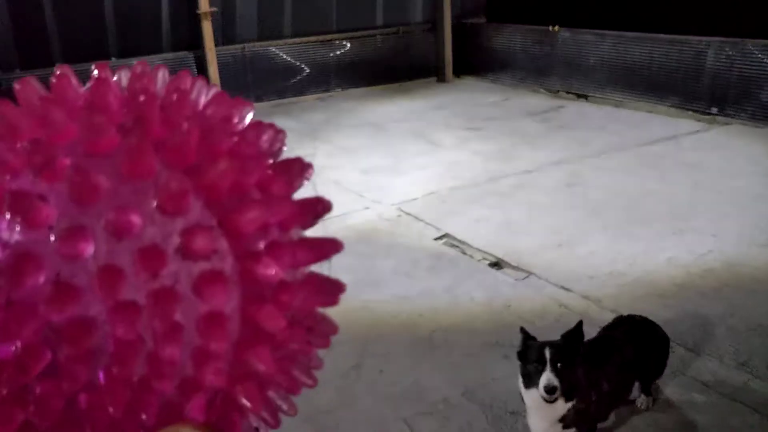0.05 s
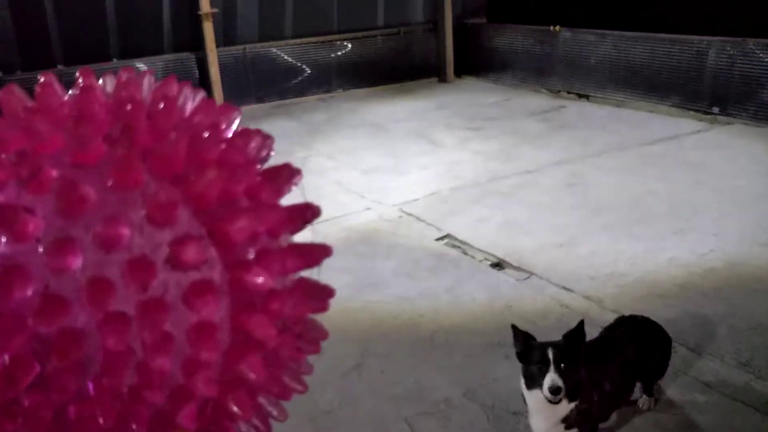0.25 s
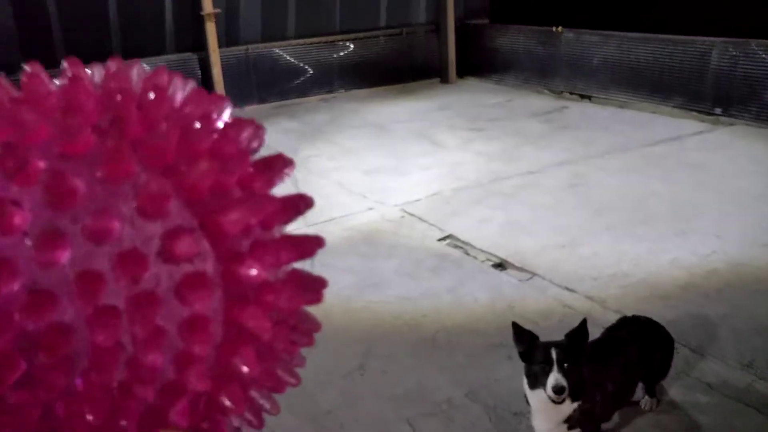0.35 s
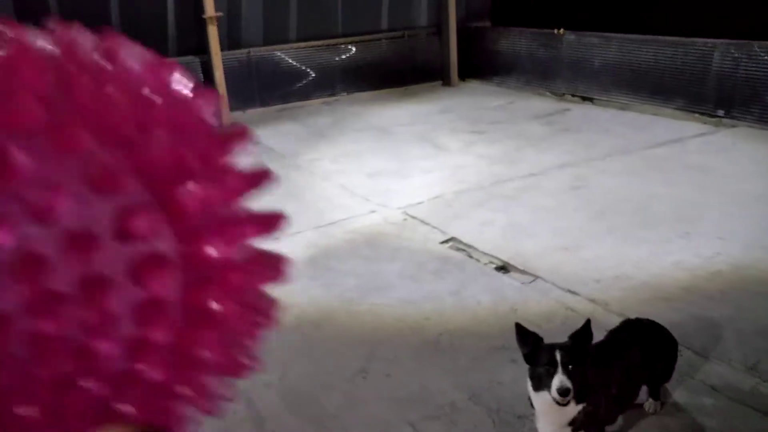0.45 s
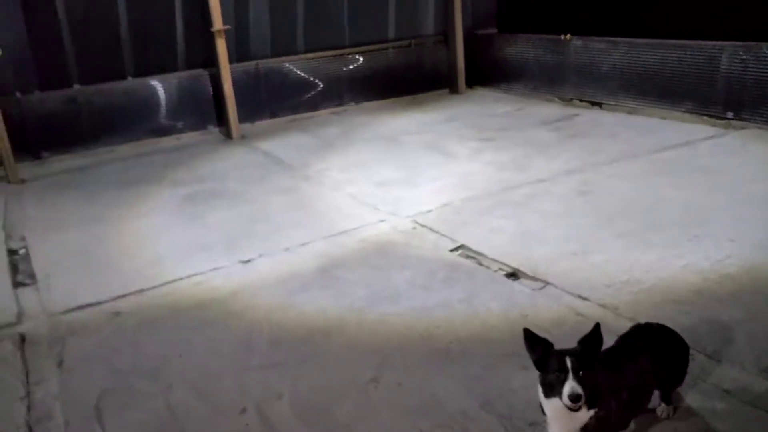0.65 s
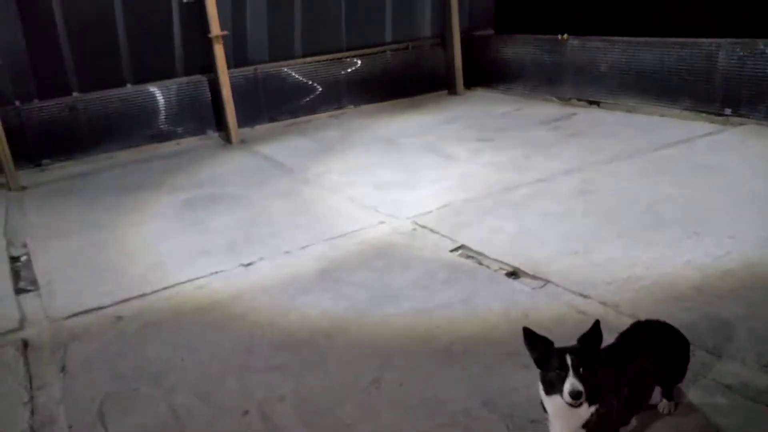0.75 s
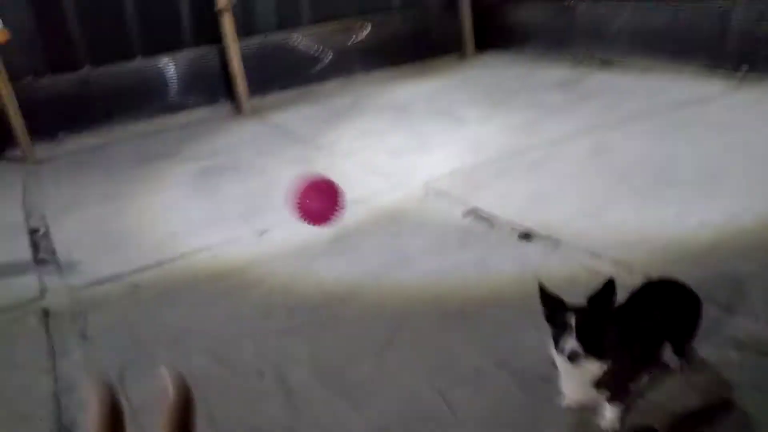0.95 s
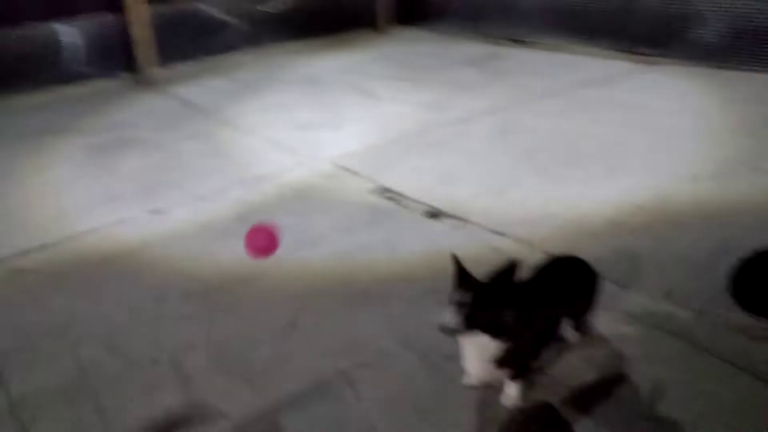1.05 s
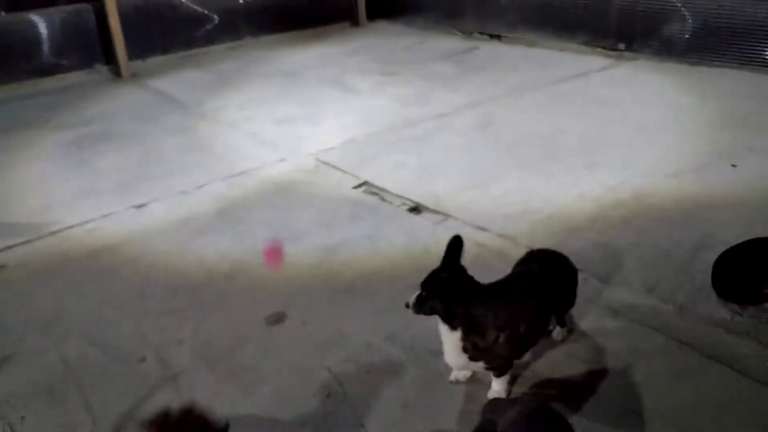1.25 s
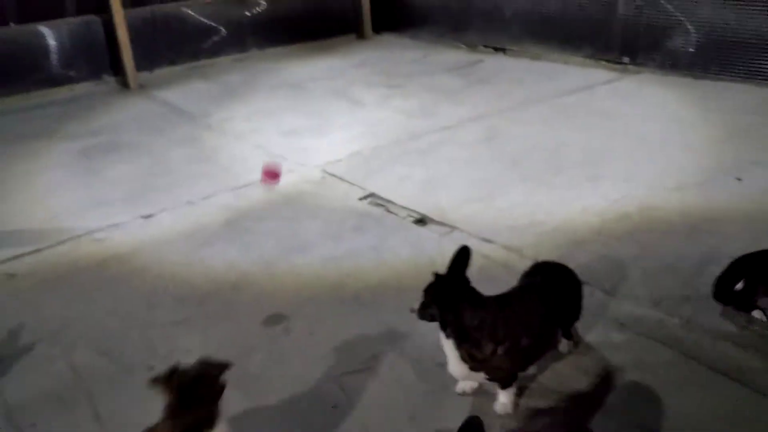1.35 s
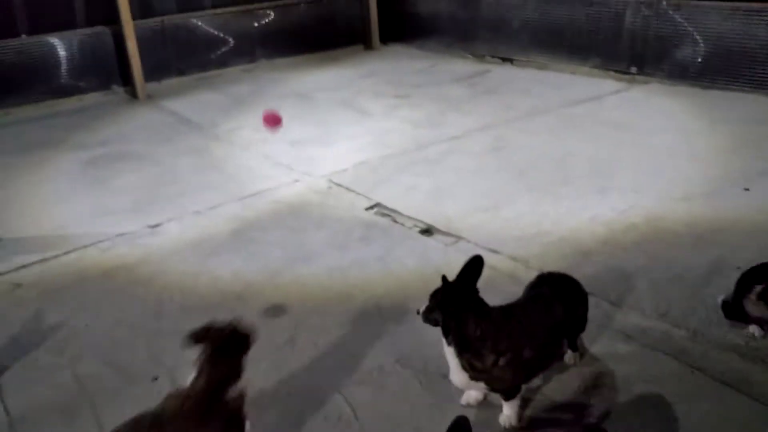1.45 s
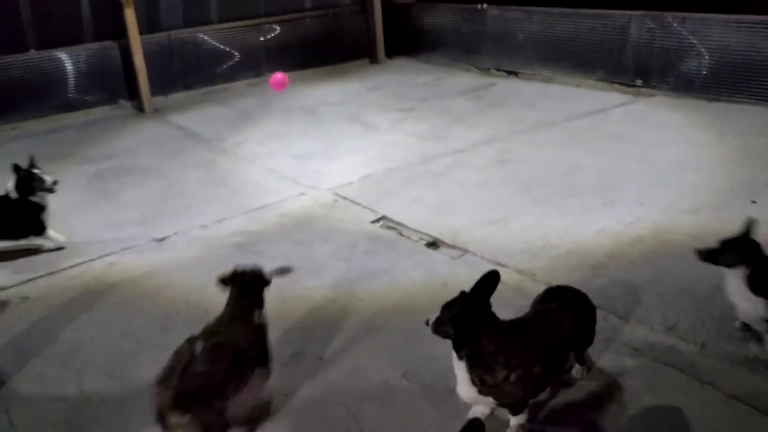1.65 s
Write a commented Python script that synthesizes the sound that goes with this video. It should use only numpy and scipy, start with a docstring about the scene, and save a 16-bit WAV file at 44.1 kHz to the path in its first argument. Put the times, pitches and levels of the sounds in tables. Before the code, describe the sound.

A hollow rubber ball bounces once on concrete at about 1.3 seconds, a slap and ringing thump echoing briefly in a shed. Soft low microphone bumps run throughout, strongest near 0.3 seconds. Clothing swishes quietly from 0.2 seconds, with a faint wavering hum from 0.5 to 1.2. Dog claws tick and paws scuff lightly from 0.9 seconds until about 1.7, over quiet room air.

```python
"""In a shed, a spiky rubber ball is thrown across the concrete floor and bounces once:
the spikes slap, the hollow shell thumps and rings, and the walls answer.
Dogs start after it, claws ticking and paws scuffing on the grit. Clothing swishes with the throw.
Underneath sit soft low bumps on the hand-held microphone, a faint wavering hum and room air."""
import sys
import numpy as np
from scipy import signal
from scipy.fft import rfft, irfft
from scipy.io import wavfile

SR = 44100
rng = np.random.default_rng(int(sys.argv[2]) if len(sys.argv) > 2 else 0)


def put_to_file(sound):
    """Save the sound as 16-bit audio at rate SR, in the file named by the first command-line argument."""
    columns = np.atleast_2d(sound).T  # one column per channel
    safe = np.clip(columns, -1, 1)
    whole_steps = np.round(safe * 32767)
    wavfile.write(sys.argv[1], SR, whole_steps.astype(np.int16))


N = 74970
T = np.arange(N) / SR

# ring of the hollow ball: f/Hz, relative level/dB, t60/s
BALL_MODES = [(157, 0.5, 0.28), (308, -1.5, 0.15), (472.6, -7.5, 0.28), (598, 3.5, 0.079), (724, -17, 0.11),
              (807, -5, 0.061), (835, -17.5, 0.25), (898, -13.5, 0.2), (1080, -13, 0.12),
              (1238, -14.5, 0.08), (1990, -11.5, 0.1), (2122, -25, 0.069), (2338, -22, 0.097),
              (2537, -24, 0.12), (2710, -21, 0.063), (3560, -27, 0.32)]
# slap of the spikes: f/Hz, relative level/dB
SLAP_EQ = [(60, 6.5), (200, -7.5), (370, -6.5), (430, 2), (650, 0), (1000, -3), (1400, -13.5), (1650, -17),
           (2100, -9.5), (2800, -12.5), (3100, -15.5), (4300, -13), (6000, -16.5), (7500, -28.5),
           (10500, -23), (15000, -28)]
# dull thump of the squashed shell: delay/s, level/dB, f/Hz, half length/s
SHELL_THUMPS = [(0.0124, -21.5, 280, 0.0015), (0.0187, -18, 119, 0.0025)]
# claw ticks and small knocks: t/s, level/dB, centre f/Hz, width/octaves, t60/s
CLAW_TICKS = [(.8695, -35, 900, .9, .022), (.9798, -33.5, 3000, .55, .014), (1.5955, -28, 5500, 1.4, .007),
              (1.662, -32, 11000, .4, .011), (1.1935, -38, 4000, 1.1, .03), (1.2067, -34, 9000, 1, .012),
              (1.2436, -44, 10400, .5, .008), (1.4436, -43, 9000, 1, .015), (1.5008, -39, 10300, .5, .008),
              (1.588, -33, 8000, .8, .011), (1.592, -39, 8000, .8, .012), (1.6045, -43, 5000, .6, .012)]
# tone shared by the ticks: f/Hz, relative level/dB
CLAW_EQ = [(300, 7.5), (6200, 6), (7500, -16), (9000, -0.5), (10300, 13), (14000, -4.5)]
# paw scuffs: t/s, level/dB, half length/s
PAW_SCUFFS = [(1.087, -52.5, .015), (1.13, -55, 0.017), (1.208, -43, 0.0062), (1.53, -48, 0.017),
              (1.582, -58.5, 0.027), (1.665, -47.5, 0.053)]
# fine shuffling: t/s, level/dB
SHUFFLE_FADER = [(0, -70.5), (.2, -63.5), (.27, -60), (.31, -63.5), (.35, -54.5), (.39, -62), (.72, -74),
                 (.86, -54), (.95, -58.5), (1.07, -57.5), (1.25, -50.5), (1.4, -51.5), (1.48, -59.5),
                 (1.57, -58), (1.7, -57.5)]
# grit on concrete: f/Hz, relative level/dB
GRIT_EQ = [(200, -2), (1400, -13), (2200, -3), (3000, -2.5), (4200, 3.5), (6200, 2.5), (7300, -10),
           (9000, -6.5), (10300, 3.5), (11800, -9), (15000, -1.5)]
# swish of clothing: t/s, level/dB
SWISH_FADER = [(0, -67), (.18, -61.5), (.23, -53), (.28, -52.5), (.31, -59.5), (.345, -51.5), (.38, -61.5),
               (.43, -56), (.5, -61.5), (.57, -55), (.63, -47.5), (.69, -50.5), (.78, -47.5), (.85, -50),
               (.96, -49.5), (1.08, -50), (1.25, -53), (1.45, -61.5), (1.7, -59)]
# tone of the cloth: f/Hz, relative level/dB
SWISH_EQ = [(100, 9), (400, 2.5), (560, 6), (800, 3.5), (1000, -3), (1240, 1), (1500, -6.5), (2100, -2),
            (3200, -7), (4500, -9), (5600, -11), (6400, -17.5), (7500, -26), (10500, -19), (15000, -31)]
# two rings in the swish: t/s, low ring level/dB, high ring level/dB
RING_FADERS = [(.5, -77, -75), (.58, -63, -61.5), (0.629, -56, -56.5), (.7, -62.5, -68), (.74, -50, -55),
               (.81, -53.5, -65), (.95, -58.5, -73), (1.08, -60.5, -85), (1.17, -61, -87)]
# where those rings sit: f/Hz, width/Hz
SWISH_RINGS = [(1890, 122), (2850, 850)]
# bumps on the microphone: t/s, relative level/dB, f/Hz, half length/s
MIC_BUMPS = [(0.024, -34, 76, 0.011), (.06, -29.5, 81, 0.0074), (0.098, -26, 66.7, 0.0092),
             (.123, -28.5, 177, 0.0013), (.222, -23, 120, 0.012), (0.24, -14.5, 95, 0.01),
             (0.268, -17.5, 115, 0.0064), (.301, -22, 114, 0.0041), (0.343, -19.5, 92, 0.0094),
             (.405, -28, 172, 0.0041), (.43, -28, 85, 0.011), (0.475, -38.5, 70, .012),
             (0.538, -36, 57, 0.014), (.609, -30, 116, 0.0096), (0.625, -26, 77, 0.0079),
             (0.689, -33, 76.5, 0.0037), (.746, -30, 96, 0.0071), (.779, -19.5, 115, 0.004),
             (.801, -30.5, 87, 0.018), (.835, -35, 158, 0.024), (0.904, -29.5, 76, 0.0084),
             (.98, -24, 93, 0.0037), (1.041, -27.5, 112.3, 0.014), (1.083, -19, 88.5, 0.0036),
             (1.146, -24.5, 88.9, 0.0029), (1.205, -30.5, 79, 0.021), (1.265, -29, 69.7, .02),
             (1.377, -27, 75, 0.015), (1.418, -30, 85, 0.0096), (1.535, -33, 60, 0.011),
             (1.669, -42, 61, 0.022)]
# handling rumble: t/s, relative level/dB
RUMBLE_FADER = [(0, -52.5), (.11, -47), (.145, -50.5), (.19, -41), (.24, -27), (.3, -44.5), (.35, -33.5),
                (.38, -47), (.5, -51.5), (.6, -39), (.8, -39), (.88, -43), (.95, -46.5), (1.2, -42.5),
                (1.26, -42), (1.35, -39), (1.48, -52), (1.62, -52.5), (1.7, -48)]
# tone of the rumble: f/Hz, relative level/dB
RUMBLE_EQ = [(15, -26), (30, -15), (55, 2), (90, -5), (120, -4), (160, -4.5), (230, -11), (340, -19.5),
             (450, -33), (1500, -76), (5000, -91)]
# glide and swell of the hum: t/s, f/Hz, level/dB
HUM_PATH = [(0.516, 264.4, -68), (0.536, 271, -46), (0.601, 298.9, -48), (.72, 304, -47),
            (.77, 299.6, -47.5), (.81, 287.3, -48), (.96, 292.8, -58), (1.009, 277.5, -46),
            (1.08, 267, -44), (1.11, 291.6, -64), (1.16, 273.6, -51), (1.251, 280, -66)]
# reverb of the shed: f/Hz, t60/s
SHED_DECAY = [(100, 0.4), (500, 0.66), (1000, 0.46), (2500, 0.52), (6000, 0.33), (14000, 0.48)]
# room air: f/Hz, relative level/dB
AIR_EQ = [(30, -3), (100, 7), (300, 13), (600, -9.5), (1500, -2.5), (2200, -25), (5500, -10.5), (7500, -22),
          (10500, -22), (15000, -14)]
# stereo width, side against mid: f/Hz, level/dB
SIDE_EQ = [(20, -85), (3300, -73), (3900, -40), (5500, -28), (8000, -4.5), (10500, -8), (14000, -4.5)]


def ball(start=1.2785, squash_cycles=2.2, wall_delay_s=.03):
    """The spikes slap the concrete; the shell squashes and rings, low modes blooming last."""
    ring = np.zeros(N)
    for hz, db, t60 in BALL_MODES:
        mode = np.sin(2 * np.pi * (hz * T + rng.random()))
        ring += amp(db - 20) * strike(start, squash_cycles / hz, t60) * mode
    slap = amp(-25) * strike(start, rise=.0005, t60=.084) * noise(SLAP_EQ)
    thump = sum(soft_bump(start + delay, db, hz, half) for delay, db, hz, half in SHELL_THUMPS)
    wall_echo = amp(-11) * np.interp(T - wall_delay_s, T, slap + thump)
    reverb_send = amp(-19) * (ring + thump) + amp(-.5) * slap
    return ring + slap + thump + wall_echo + shed_reverb(reverb_send)


def paws(grains_per_s=4100, spread_db=2):
    """Pads drag over grit and claws tick on the concrete."""
    grain_gain = amp(spread_db * np.minimum(rng.exponential(1, N), 4))
    grains = grain_gain * rng.standard_normal(N) * (rng.random(N) < grains_per_s / SR)
    scuffs = sum(amp(db) * np.exp(-((T - s) / half) ** 2) for s, db, half in PAW_SCUFFS)
    pads = (fader(SHUFFLE_FADER) + scuffs) * unit(eq(grains, GRIT_EQ))
    steps = pads + sum(claw_tick(*row) for row in CLAW_TICKS)
    return steps + amp(-14.5) * shed_reverb(steps)


def claw_tick(start, db, centre_hz, octaves, t60, rise_s=.0002):
    """A claw hits concrete: a hard snap and a short gritty tail in one band."""
    hz = np.fft.rfftfreq(N, 1 / SR)
    bell = np.exp(-(np.log2((hz + 1) / centre_hz) / octaves) ** 2 / 2)
    band = bell * amp(curve_at(CLAW_EQ, hz + 1))
    snap = irfft(band * np.exp(-2j * np.pi * hz * (start + 2 * rise_s)), N)  # click on the attack
    grit = strike(start, rise_s, t60) * unit(irfft(rfft(rng.standard_normal(N)) * band, N))
    return amp(db) * (amp(2) * snap / snap.max() + grit)


def clothing(flutter_db=1.63):
    """Cloth rubs in a fluttering swish, with two noisy rings that come and go."""
    swish = fader(SWISH_FADER) * noise(SWISH_EQ) * amp(flutter_db * drift(rate_hz=61))
    times, *levels = np.transpose(RING_FADERS)
    for db, (hz, width_hz) in zip(levels, SWISH_RINGS):
        phase = 2 * np.pi * hz * T
        ring = drift(width_hz) * np.cos(phase) + drift(width_hz) * np.sin(phase)
        swish += amp(np.interp(T, times, db)) * unit(ring)
    return swish


def handling():
    """The hand nudges the microphone's body: soft bumps over an uneven rumble."""
    bumps = sum(soft_bump(*row) for row in MIC_BUMPS)
    rumble = fader(RUMBLE_FADER) * noise(RUMBLE_EQ)
    return amp(-2) * bumps + amp(1) * rumble


def hum(waver=.0281, roughness=.35):
    """A faint, rough tone that wavers, with a touch of its octave."""
    times, hz, db = np.transpose(HUM_PATH)
    pitch = np.interp(T, times, hz) * (1 + waver * drift(rate_hz=38.2))
    phase = 2 * np.pi * np.cumsum(pitch) / SR
    tone = unit(np.sin(phase) + amp(-21.5) * np.sin(2 * phase))
    swell = np.interp(T, times, amp(db), left=0, right=0)
    return tone * swell * (1 + roughness * drift(rate_hz=57))


def shed_reverb(send, build_s=.015):
    """The walls return a diffuse tail, each band dying at its own speed."""
    hz, t, bands = signal.stft(rng.standard_normal(SR), SR, nperseg=256)
    decay = np.exp(-np.log(1000) * t / curve_at(SHED_DECAY, hz)[:, None])
    tail = signal.istft(bands * decay, SR, nperseg=256)[1]
    tail *= np.minimum(np.arange(len(tail)) / SR / build_s, 1) ** 2
    return signal.fftconvolve(send, tail / np.linalg.norm(tail))[:N]


def room_air():
    """A quiet, steady bed of room tone."""
    return amp(-62) * noise(AIR_EQ)


def soft_bump(centre_s, db, hz, half_s):
    """One dull push: a low sine under a bell-shaped envelope."""
    t = T - centre_s
    return amp(db) * np.exp(-(t / half_s) ** 2 / 2) * np.sin(2 * np.pi * hz * t)


def strike(start, rise, t60):
    """Hit envelope: quick attack, exponential decay, times in seconds."""
    t = np.maximum(T - start, 0)
    return (1 - np.exp(-t / rise)) * np.exp(-np.log(1000) * t / t60)


def drift(rate_hz):
    """Smooth random modulation at rms 1."""
    rolloff = np.exp(-(np.fft.rfftfreq(N, 1 / SR) / rate_hz) ** 2)
    return unit(irfft(rfft(rng.standard_normal(N)) * rolloff, N))


def noise(points):
    """Coloured noise at rms 1."""
    return unit(eq(rng.standard_normal(N), points))


def eq(x, points):
    """Shapes the tone with an EQ curve."""
    return irfft(rfft(x) * amp(curve_at(points, np.fft.rfftfreq(N, 1 / SR))), N)


def curve_at(points, hz):
    """Reads a curve on a log-frequency axis."""
    f, value = np.transpose(points)
    return np.interp(np.log(hz + 1), np.log(f + 1), value)


def fader(points):
    """Rides the gain through t/s, level/dB points."""
    return amp(np.interp(T, *np.transpose(points)))


def amp(db):
    """Decibels to gain."""
    return 10 ** (np.asarray(db) / 20)


def unit(x):
    """Scales to rms 1."""
    return x / np.sqrt(np.mean(x ** 2) + 1e-20)


def scene():
    """Everything sits in the centre; only the treble spreads left and right."""
    mid = handling() + hum() + ball() + clothing() + paws() + room_air()
    side = eq(ball() + clothing() + paws() + room_air(), SIDE_EQ)  # fresh noise gives the width
    return np.array([mid + side, mid - side])


def record(dry, low_cut_hz=28, high_cut_hz=14450):
    """The microphone's low cut, then a steep high cut."""
    cut = signal.sosfilt(signal.butter(2, low_cut_hz, "high", fs=SR, output="sos"), dry)
    lowpass = signal.firwin(511, high_cut_hz, window=("kaiser", 9), fs=SR)
    return signal.oaconvolve(cut, lowpass[None], "same")


dry = scene()
out = record(dry)
put_to_file(out)
```